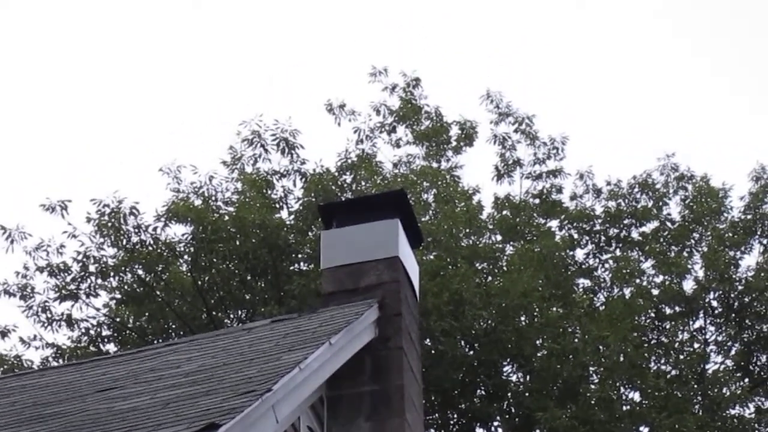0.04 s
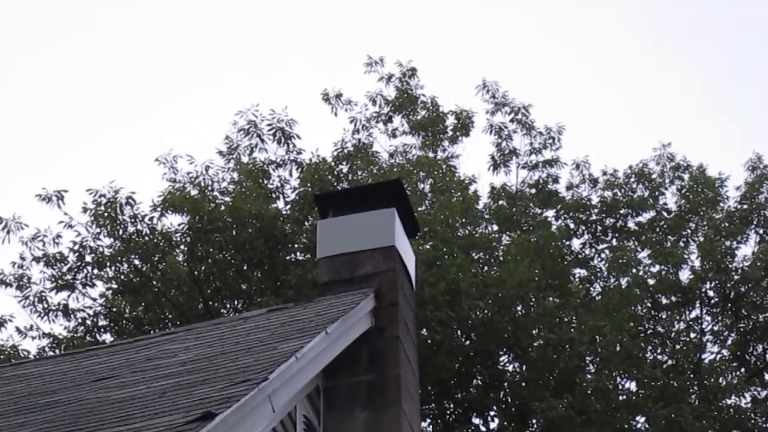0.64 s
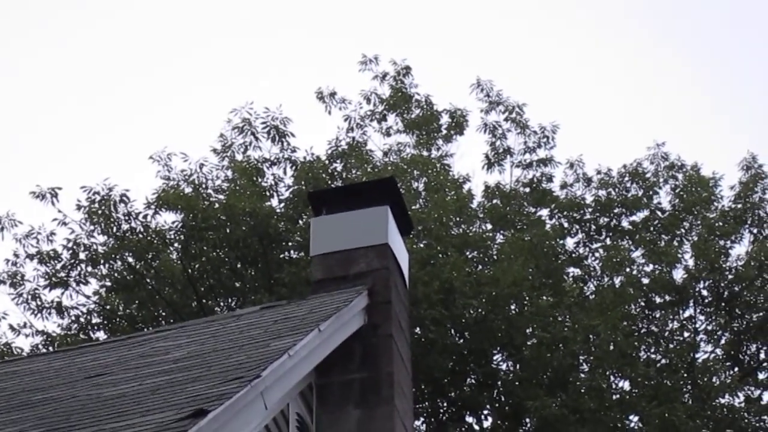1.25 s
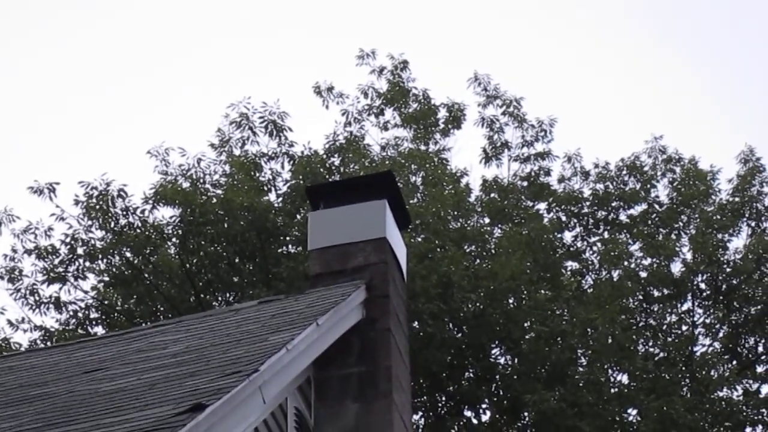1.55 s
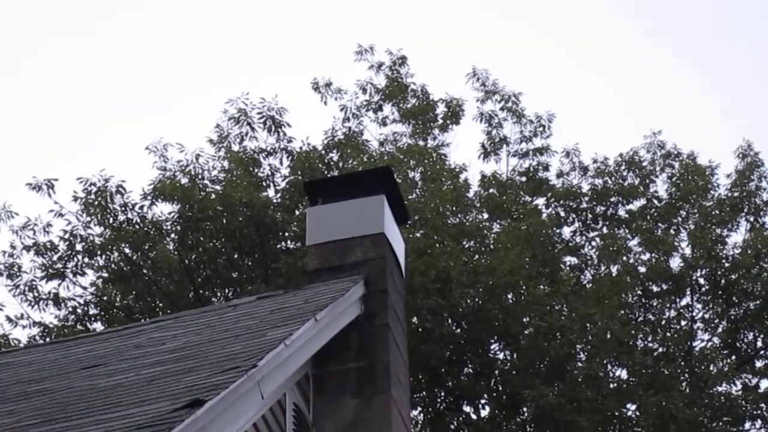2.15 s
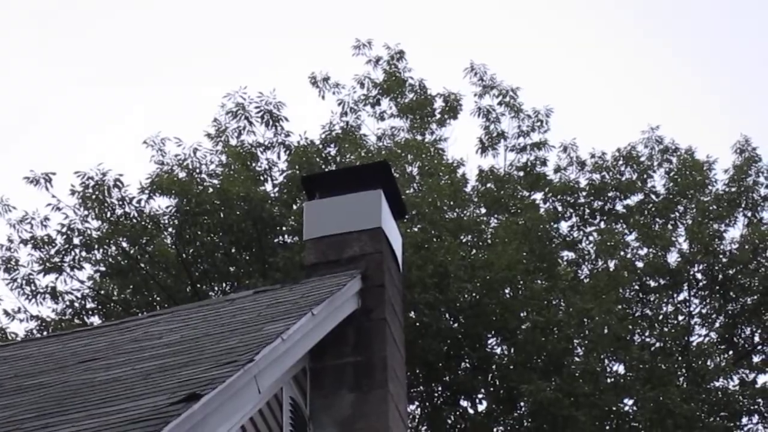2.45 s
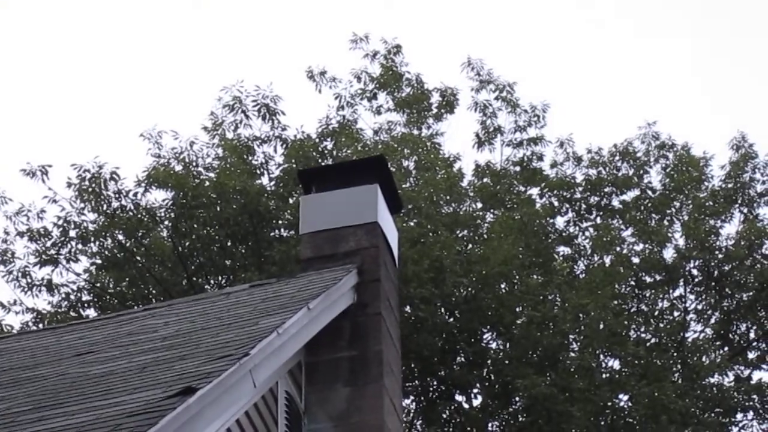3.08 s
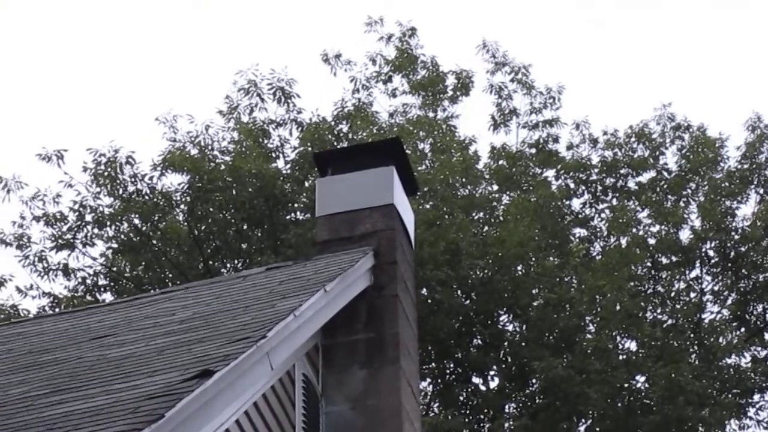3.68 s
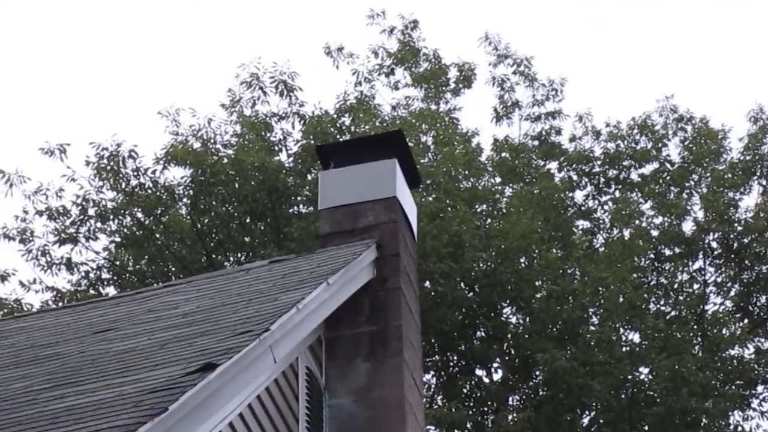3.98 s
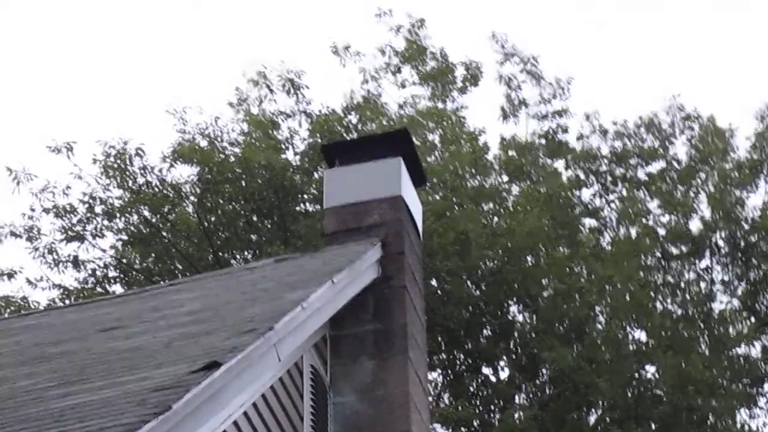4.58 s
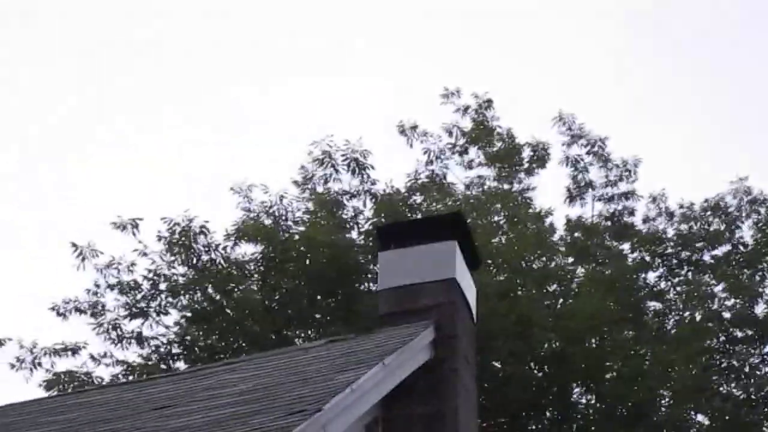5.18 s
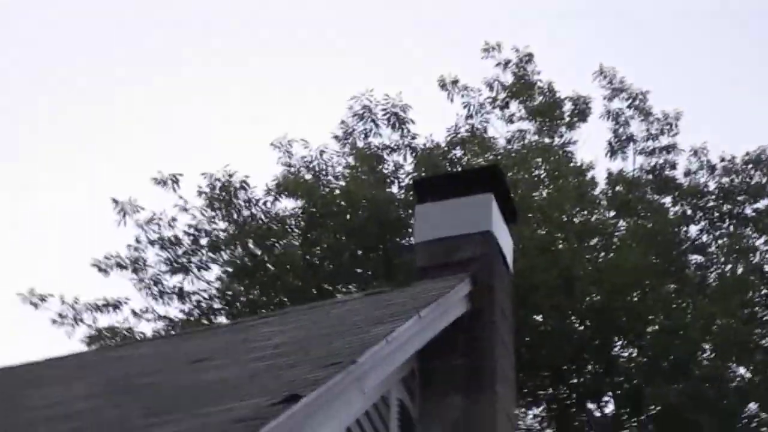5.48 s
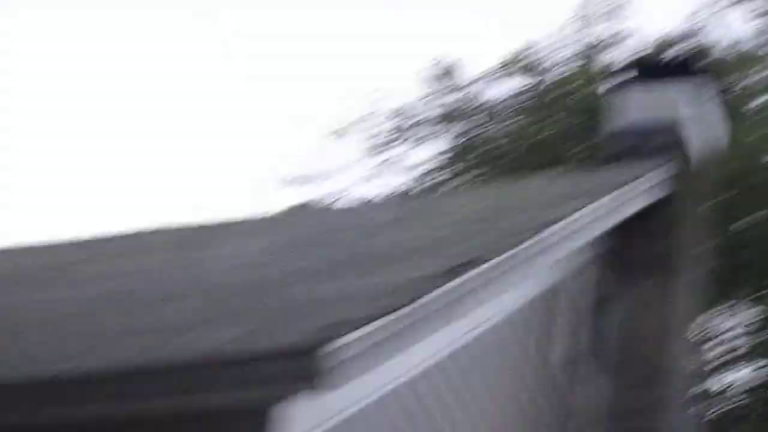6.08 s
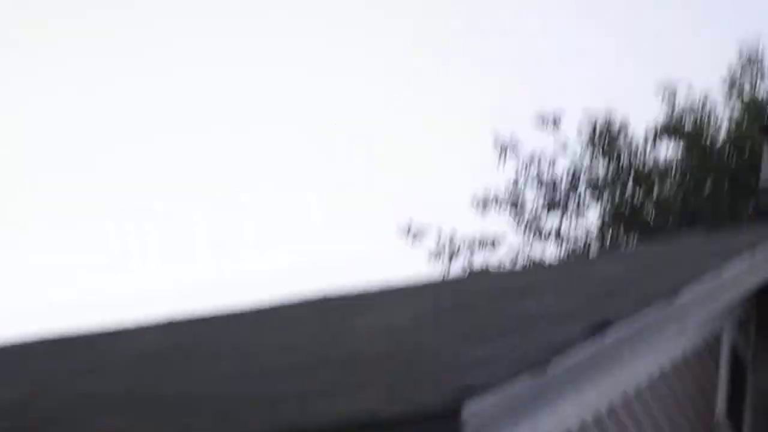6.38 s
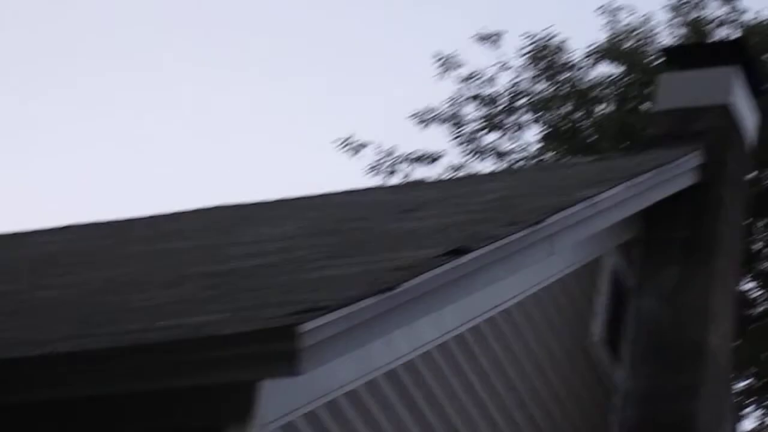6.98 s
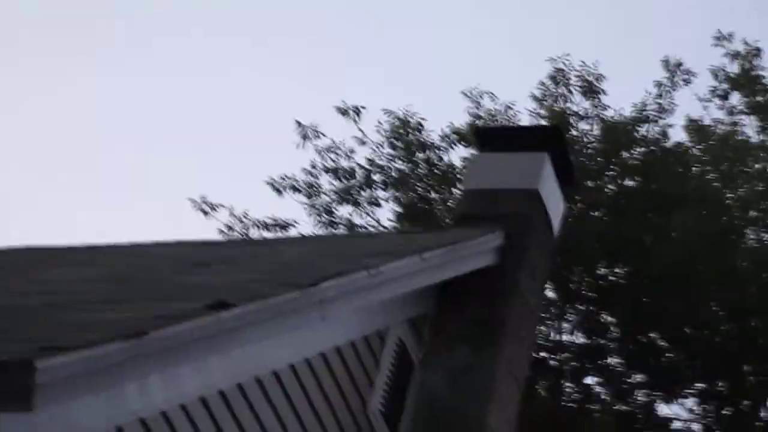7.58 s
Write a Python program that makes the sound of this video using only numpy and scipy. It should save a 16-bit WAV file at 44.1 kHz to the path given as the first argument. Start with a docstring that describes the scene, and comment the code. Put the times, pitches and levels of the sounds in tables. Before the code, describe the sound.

Several kinds of crickets sing softly outdoors beside a house and trees: a fast shrill trill, high scraping runs, a gentle pulsing note and regular chirps. A far bird joins with alternating rising and falling whistles, slightly echoing. In the last third, much louder rubbing, clicking and bumping hits the camera's microphone, briefly pushing the background down, then eases to scattered scrapes and knocks as the insects carry on.

```python
"""Ground crickets scrape their wings in even runs of arching strokes, in a garden at dusk.
A fast trill and a tree cricket run on over the low murmur of the surroundings; a field cricket
chirps, and a distant bird repeats a two-note whistle. Late on, a hand shifts on the camera:
its case clicks, rubs and thumps right at the single microphone, and the gain ducks."""
import sys
import numpy as np
from scipy import signal
from scipy.fft import rfft, irfft, next_fast_len
from scipy.io import wavfile
from scipy.ndimage import uniform_filter1d, map_coordinates

SR = 44100
rng = np.random.default_rng(int(sys.argv[2]) if len(sys.argv) > 2 else 0)


def output_pcm(signal):
    """Save a mono or channel-first signal as 16-bit PCM at the path in sys.argv[1].

    Samples are clipped to [-1, 1] before scaling.
    """
    pcm = np.clip(np.atleast_2d(signal).T, -1, 1) * 32767
    wavfile.write(sys.argv[1], SR, np.round(pcm).astype(np.int16))


N = 345744
TIME = np.arange(N) / SR
LEAD_S = .05  # from the start of a short sound's window to its centre


def amp(db):
    """Decibels to gain."""
    return 10 ** (np.asarray(db) / 20)


def unit(x):
    """Scale to rms 1."""
    return x / np.sqrt(np.mean(x ** 2) + 1e-20)


def curves(rows, at=TIME):
    """Interpolate each later column along the first."""
    knots, *columns = np.transpose(rows)
    return [np.interp(at, knots, column) for column in columns]


def wobble(rate):
    """A smooth random curve, rate knots a second."""
    return map_coordinates(rng.standard_normal(int(N * rate / SR) + 4), [TIME * rate])


def filtered(x, response):
    """Shape x with a complex response of frequency."""
    size = next_fast_len(N + SR // 2)
    return irfft(rfft(x, size) * response(np.fft.rfftfreq(size, 1 / SR)), size)[:N]


def resonance(f, hz, width_hz):
    """Complex response of one damped mode."""
    return 1j * f * width_hz / (hz * hz - f * f + 1j * f * width_hz)


def low_pass(f, hz):
    """Complex response of a two-pole low-pass."""
    return 1 / (1 + np.sqrt(2) * 1j * f / hz - (f / hz) ** 2)


def noise(spectrum):
    """Noise of rms 1 with a spectrum of (Hz, dB) points."""
    hz, db = np.transpose(spectrum)
    white = rng.standard_normal(N)
    return unit(filtered(white, lambda f: amp(np.interp(np.log(f + 1), np.log(hz), db))))


def band(hz, width_hz):
    """Narrow noise of rms 1."""
    return unit(filtered(rng.standard_normal(N), lambda f: 1 / (1 + ((f - hz) / width_hz) ** 4)))


def tone(hz):
    """A sine that follows a pitch curve."""
    return np.sin(2 * np.pi * (np.cumsum(hz) / SR + rng.random()))


def add(out, s, sound):
    """Mix a sound into out from time s on."""
    start = int(round(s * SR))
    part = sound[max(-start, 0):max(N - start, 0)]
    out[max(start, 0):][:len(part)] += part


def scattered(x, wet_db, t60):
    """A sound plus its diffuse answer from trees and walls."""
    t = TIME[:SR // 2]
    tail = rng.standard_normal(len(t)) * amp(-60 * t / t60)
    return x + amp(wet_db) * signal.fftconvolve(x, tail / np.linalg.norm(tail))[:N]


def wing_stroke(hz, fall, late, half_length_s):
    """One wing closure: the scraper speeds up and slows on the file, so the pitch arches and drops."""
    u = (TIME[:SR // 10] - LEAD_S) / half_length_s
    swell = np.exp(-np.abs(u - late) ** 4.5)
    uneven_teeth = amp(1.5 * map_coordinates(rng.standard_normal(40), [np.linspace(0, 39, len(u))]))
    pitch = hz * (1 - fall * np.clip(u, -1, 3) ** 2)
    return swell * uneven_teeth * (tone(pitch) + amp(-34) * tone(2 * pitch))


# Lone, deeper strokes. Each row: time in seconds, relative level in dB.
LONE_STROKES = [(.011, -52), (2.101, -52), (2.248, -49), (2.765, -52), (3.218, -54), (3.485, -51),
                (3.756, -54), (4.304, -51), (4.5, -53), (4.825, -52), (4.996, -52), (5.691, -39),
                (6.379, -43), (6.602, -40), (6.922, -38), (7.129, -37.5), (7.348, -37), (7.657, -36.5)]
# Even runs of strokes. Each row: first and last stroke in seconds, strokes a second, pitch in Hz,
# climb over the run in Hz, relative level in dB, swell over the run in dB.
STROKE_RUNS = [(.182, .521, 14.8, 6640, 39, -55, 2), (.589, 1.398, 14.85, 6830, 160, -51.5, 2),
               (1.578, 2.0, 14.2, 6870, -25, -51.5, 2), (2.281, 3.226, 15.9, 7010, 40, -55.5, 6),
               (3.356, 4.2, 15.4, 7130, 158, -52, 0), (4.37, 5.493, 15.1, 7240, 260, -57.5, 15),
               (6.004, 7.822, 13.75, 7300, -26, -44.5, 2), (.048, 1.77, 16.3, 7600, -50, -56, 2),
               (5.644, 6.996, 16.3, 7580, -10, -46.5, 0)]
# Deeper strokes drop further and peak later after the crest of their arch. Each row: pitch in Hz,
# fall as a share of the pitch, lateness of the loudest moment in half lengths.
STROKE_ARCH = [(6740, .05, .5), (7200, .04, 0.33), (7620, 0.0228, 0.29)]
# The blur of far singers. Each row: time in seconds, level in dB.
FAR_CHORUS = [(0, -69), (1.5, -65), (2.8, -75), (5.2, -66), (6.2, -58.5), (7.84, -58)]


def ground_crickets():
    """Wings scrape in even runs and lone strokes, over a blur of farther singers."""
    strokes = [(s, 6830, db) for s, db in LONE_STROKES]  # seconds, Hz, dB
    for first, last, rate, hz, climb_hz, db, swell_db in STROKE_RUNS:
        for u in np.linspace(0, 1, round((last - first) * rate) + 1):
            stroke_db = db + swell_db * (u - .5) + rng.normal()
            strokes.append((first + u * (last - first), hz + climb_hz * (u - .5), stroke_db))
    near = np.zeros(N)
    for s, hz, db in strokes:
        fall, late = curves(STROKE_ARCH, at=hz)
        stroke = wing_stroke(hz + 35 * rng.normal(), fall, late, half_length_s=.0098)
        add(near, s - LEAD_S, amp(db - 1) * stroke)
    far = amp(curves(FAR_CHORUS)[0] + 2.9 * wobble(45)) * band(hz=7150, width_hz=350)
    return scattered(near, wet_db=-12, t60=.08) + far


# Fader moves for the trill. Each row: time in seconds, the near singer's relative level in dB,
# the crowd's level in dB.
TRILL_LEVELS = [(0, -61, -57), (.7, -55.5, -56.5), (5.3, -55.5, -57.5), (6.2, -56, -55.5),
                (7.84, -62, -51.5)]


def trill():
    """A fast wing beat, each stroke sweeping down; others of the kind merge into a shrill band."""
    near_db, crowd_db = curves(TRILL_LEVELS)
    strokes_per_s = 67 + .96 * wobble(2)
    beat = np.cumsum(strokes_per_s) / SR % 1
    drop_hz = 1150 * (beat - .5) + 600 * (beat - .5) ** 2
    sweep = tone(5560 - drop_hz + 25 * wobble(60))
    pulses = np.sin(np.pi * beat) ** 2.5 * amp(.9 * wobble(40))
    near = scattered(unit(pulses * sweep), wet_db=-12, t60=.1)
    return amp(near_db - 1.5) * near + amp(crowd_db) * band(hz=5378, width_hz=420)


# The tree cricket's drifting note. Each row: time in seconds, level in dB, pitch in Hz.
TREE_CRICKET_SONG = [(0, -67.5, 3180), (3.5, -66.5, 3177), (5.4, -61.5, 3090), (6.3, -74, 3084),
                     (7.84, -60.5, 3150)]


def tree_cricket():
    """Beating wings give a soft, pure, pulsing note among more distant ones."""
    level_db, hz = curves(TREE_CRICKET_SONG)
    strokes_per_s = 36.4 + .2 * wobble(2)
    beat = np.cumsum(strokes_per_s) / SR % 1
    song = unit(np.sin(np.pi * beat) ** 2 * tone(hz - 60 * beat + 5 * wobble(20)))
    far = amp(-64.5) * band(hz=3080, width_hz=260)
    return amp(level_db) * scattered(song, wet_db=-19, t60=.13) + far


# The dark bed of evening air. Each row: frequency in Hz, relative level in dB.
AIR_SPECTRUM = [(15, -23), (28, -3), (80, -10), (160, -12), (220, -14), (500, -16.5), (1000, -17),
                (1750, -20), (2900, -23.5), (3800, -28), (6300, -30.5), (8400, -38), (11200, -40.5),
                (15500, -48)]
# Swells of a distant drone. Each row: middle and half length in seconds, pitch in Hz, level in dB.
DRONE_SWELLS = [(0.693, 0.62, 159, -59), (1.453, 0.55, 54, -54), (2.95, 0.58, 158.5, -62.5),
                (4.398, .22, 54.3, -51), (5.12, .22, 54.4, -52.5), (7.055, 0.27, 54.6, -52.5)]


def surroundings():
    """The even murmur of the evening air and a low, far drone that swells now and then."""
    air = amp(-49.5 + .23 * wobble(4.45)) * noise(AIR_SPECTRUM)
    drone = amp(-61) * band(hz=50.4, width_hz=6.3)
    for s, half_length, hz, db in DRONE_SWELLS:
        swell = np.exp(-((TIME - s) / half_length) ** 4)
        drone += amp(db) * swell * band(hz, width_hz=.086 * hz)
    return air + drone


# The field cricket's chirps. Each row: middle of the chirp in seconds, relative level in dB.
CHIRPS = [(.39, -53), (0.83, -56), (1.228, -56), (1.64, -59), (2.033, -58), (2.535, -56), (3.483, -56),
          (4.06, -56), (4.532, -54), (5.15, -54), (5.6, -51), (6.17, -61), (6.815, -54), (7.438, -50)]


def field_cricket():
    """Each chirp is three falling wing strokes, each higher and stronger than the one before."""
    chirps = np.zeros(N)
    spacing_s = .039
    for s, db in CHIRPS:
        for k in (-1, 0, 1):
            stroke = wing_stroke(hz=4570 + 60 * k, fall=.04, late=.5, half_length_s=.0105)
            add(chirps, s - LEAD_S + k * spacing_s - .004, amp(db - 1 + .6 * k) * stroke)
    return scattered(chirps, wet_db=-21, t60=.067) + amp(-75) * band(hz=4640, width_hz=320)


def whistle(hz, edge):
    """A pure note along a pitch curve; edge is the share of its length that each fade takes."""
    u = np.linspace(0, 1, len(hz))
    return np.sin(np.pi / 2 * np.clip(np.minimum(u, 1 - u) / edge, 0, 1)) * tone(hz)


# The bird's two notes. Each row: start in seconds, opening pitch in Hz, relative level in dB.
RISING_NOTES = [(3.428, 1900, -56), (3.822, 1900, -50.5), (4.222, 1890, -48.5), (4.608, 1860, -47),
                (4.978, 1840, -47.5), (5.354, 1820, -46.5)]
FALLING_NOTES = [(3.604, 3190, -50), (4.009, 3170, -51), (4.409, 3124, -50.5), (4.79, 3110, -48.5),
                 (5.158, 3055, -46.5)]


def bird():
    """A rising whistle alternates with one that holds, then slurs down; both echo in the trees."""
    rising_s, rise_hz_per_s = .066, 4440
    falling_s, hold_s, break_s, slur_hz_per_s = .12, .052, .012, 10800
    calls = np.zeros(N)
    t = TIME[:int(rising_s * SR)]
    for s, hz, db in RISING_NOTES:
        add(calls, s, amp(db) * whistle(hz + rise_hz_per_s * t, edge=.46))
    t = TIME[:int(falling_s * SR)]
    slur_hz = slur_hz_per_s * np.maximum(t - hold_s, 0)
    # the voice breaks as the slur begins and stays softer after it
    into_break = (t - hold_s) / break_s
    thinning = amp(-np.clip(into_break, 0, 1) - 3 * np.exp(-(into_break - 1) ** 2))
    for s, hz, db in FALLING_NOTES:
        add(calls, s, amp(db) * thinning * whistle(hz - slur_hz, edge=.18))
    flutter = amp(1.6 * wobble(120) - 2)
    return scattered(calls * flutter, wet_db=-4, t60=.7)


# The ring of the camera's plastic case. Each row: pitch in Hz, width in Hz, relative level in dB.
CASE_MODES = [(1570, 280, -7.5), (1880, 290, -3.5), (2100, 49, -2), (3130, 580, -1.5), (4050, 330, -7),
              (5650, 200, -6), (7870, 170, -2.5), (9460, 110, -8), (12000, 620, -20)]


def through_case(cracks):
    """Cracks reach the microphone directly and as a brief ring of the case."""
    def response(f):
        ring = sum(amp(db) * resonance(f, hz, width_hz) for hz, width_hz, db in CASE_MODES)
        treble_cut = low_pass(f, hz=9500) / (1 + 1j * f / 7000)
        bass_cut = 1j * f / (1100 + 1j * f)
        return amp(5.5) * ring + amp(.5) * treble_cut * bass_cut
    return filtered(cracks, response)


# Creaks of the case. Each row: start in seconds, relative level in dB, seconds to die away by 60 dB.
CASE_CLICKS = [(4.634, -41, 0.0095), (5.5826, -12, 0.0068), (5.5864, -18.5, 0.011), (5.606, -31, 0.016),
               (5.892, -25, 0.0054), (5.931, -18, 0.01), (5.949, -11.5, 0.012), (5.9511, -11, 0.0046),
               (5.9534, -5, 0.0095), (5.957, -24, 0.023), (7.023, -31, 0.0037)]


def case_clicks():
    """The plastic creaks under the hand in tiny, sharp snaps."""
    snaps, t = np.zeros(N), TIME[:SR // 10]
    for s, db, t60 in CASE_CLICKS:
        add(snaps, s, amp(db - 60 * t / t60) * rng.standard_normal(len(t)))
    return through_case(snaps)


# The three colours of rubbing, dark to bright. Each row: frequency in Hz, relative level in dB.
RUMBLE_SPECTRUM = [(20, -19), (60, 1), (200, 3.5), (450, -4.5), (1000, -9.5), (2100, -15), (2700, -16),
                   (4000, -32), (9000, -49)]
RASP_SPECTRUM = [(400, 0), (1200, 3), (2100, 0.5), (2700, -2), (3900, 0.5), (4700, -0.5), (7500, 0.5),
                 (10000, -6.5), (11300, -13), (12500, -19), (15500, -23)]
FIZZ_SPECTRUM = [(4000, -30), (7500, -3), (10000, 3), (13000, -3), (15500, -13)]
# Slides of the hand. Each row: start and end in seconds, mid-slide levels of rumble, rasp and fizz
# in dB, swell of the pressure over the slide in dB.
HAND_SLIDES = [(5.296, 5.327, -72, -52, -57, -7), (5.453, 5.604, -56, -51.5, -76, 8),
               (5.581, 5.715, -44.5, -49, -57, -6.5), (5.711, 5.878, -36, -44.5, -57, 2),
               (5.851, 5.967, -29.5, -37.5, -50, -1.5), (5.979, 6.033, -32.5, -48, -54, -1),
               (6.076, 6.192, -44, -56.5, -61, -0.5), (6.27, 6.417, -61, -54.5, -80, 2),
               (6.43, 6.516, -59, -46, -66, -1), (6.682, 6.934, -65, -55.5, -87, 4),
               (6.97, 7.215, -58.5, -54.5, -83, 1.5), (7.263, 7.65, -53.5, -61, -84, -1),
               (7.656, 7.853, -58, -49.5, -62, -5)]


def hand_rubbing():
    """Each slide rumbles through the case, rasps in uneven catches and fizzes at the microphone port."""
    rumble, rasp, fizz = np.zeros((3, N))
    for start, end, rumble_db, rasp_db, fizz_db, swell_db in HAND_SLIDES:
        fade_s = .07 * (end - start)
        contact = (np.tanh((TIME - start) / fade_s) - np.tanh((TIME - end) / fade_s)) / 2
        pressure_db = swell_db * (np.clip((TIME - start) / (end - start), 0, 1) - .5)
        rumble += contact * amp(rumble_db + 2.45 * pressure_db)  # follows the pressure most steeply
        rasp += contact * amp(rasp_db + pressure_db)
        fizz += contact * amp(fizz_db + pressure_db)
    grip_s = 5.78  # from here on the turning hand keeps up a faint rasp
    rasp += amp(-58) * (1 + np.tanh((TIME - grip_s) / .16)) / 2
    catches = unit(amp(2 * wobble(400) + wobble(35)))
    judder = unit(noise(RUMBLE_SPECTRUM) * amp(3.6 * wobble(120)))
    return rumble * judder + catches * (rasp * noise(RASP_SPECTRUM) + fizz * noise(FIZZ_SPECTRUM))


# Fingers slipping on the case. Each row: time in seconds, relative level in dB, centre of the thump
# in Hz, offset of its crack in dB.
FINGER_SLIPS = [(5.592, -18, 44.3, -36), (5.611, -21.5, 44.5, -26), (5.646, -33, 90, -20),
                (5.7632, -12.5, 397, -28), (5.785, -8.5, 403, -19), (5.8563, -1.5, 605, -20),
                (5.861, -22, 250, -24), (5.888, -24, 190, -28), (5.896, -5, 460, -6.5),
                (5.934, -18.5, 170, -24), (5.942, -22, 198, -28), (5.952, -15, 204, -19),
                (6.015, -23, 198, -24), (6.244, -29, 348, -28), (6.265, -29.5, 299, -28),
                (6.29, -29, 324, -25), (6.3055, -18.5, 326, -32), (6.3198, -19, 320, -34),
                (6.3222, -19, 277, -34), (6.3396, -9.5, 282, -17.5), (6.4576, -5.5, 288, -12.5),
                (7.169, -34.5, 109, -11), (7.529, -27, 515, -28), (7.7269, -15, 320, -34),
                (7.7282, -9.5, 355.4, -14)]


def finger_thumps():
    """Each slip of the skin pushes the microphone once, shakes the camera's body and cracks briefly."""
    pushes, cracks = np.zeros((2, N))
    t, crack_t60 = TIME[:SR // 10], .006
    for s, db, hz, crack_db in FINGER_SLIPS:
        u = 2 * np.pi * hz * (t - LEAD_S)
        push = 2.4 * u / (1 + u ** 2 / 2) ** 2.91  # pressure builds, flips at the slip and relaxes
        add(pushes, s - LEAD_S, amp(db - 3) * push)
        add(cracks, s, amp(db + crack_db - 60 * t / crack_t60) * rng.standard_normal(len(t)))
    body = filtered(pushes, lambda f: 1 + amp(1) * resonance(f, hz=224, width_hz=240))
    dulled = filtered(cracks, lambda f: low_pass(f, hz=7040))  # skin is softer than plastic
    return body + through_case(dulled)


def scene():
    """The garden and the hand meet at one microphone, which feeds both channels."""
    garden = ground_crickets() + trill() + tree_cricket() + surroundings() + field_cricket() + bird()
    mono = garden + case_clicks() + hand_rubbing() + finger_thumps()
    return np.array([mono, mono])


def record(dry):
    """The camera ducks its gain after loud knocks and keeps nothing above its band limit."""
    knee_db, duck_db_per_db, lag_s, top_hz = -33, .46, .27, 15800
    power = np.abs(uniform_filter1d(dry[0] ** 2, size=SR // 50))
    over_db = np.maximum(10 * np.log10(power + 1e-12) - knee_db, 0)
    pole = np.exp(-1 / (lag_s * SR))
    gain = amp(-duck_db_per_db * signal.lfilter([1 - pole], [1, -pole], over_db))
    return np.array([filtered(x * gain, lambda f: f < top_hz) for x in dry])


dry = scene()
out = record(dry)
output_pcm(out)
```